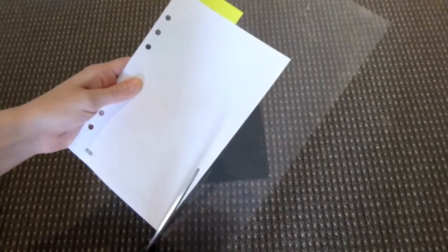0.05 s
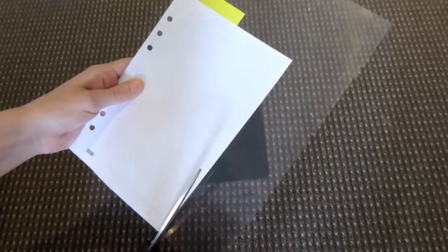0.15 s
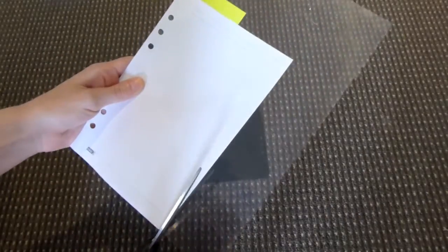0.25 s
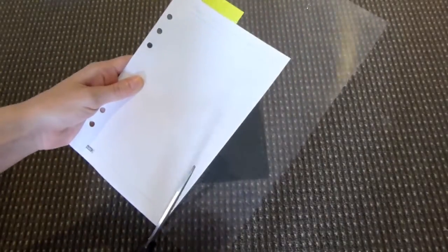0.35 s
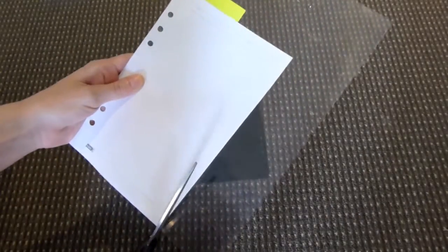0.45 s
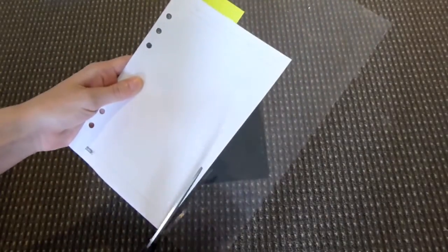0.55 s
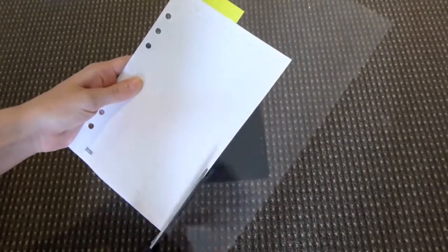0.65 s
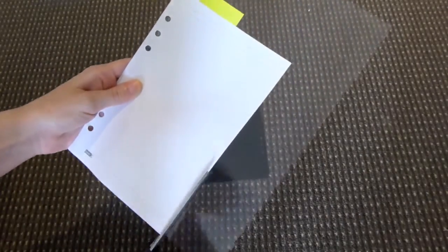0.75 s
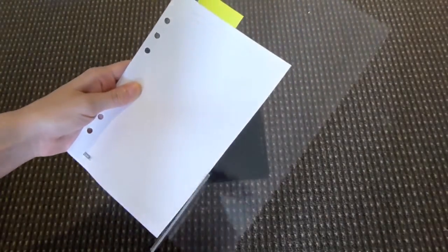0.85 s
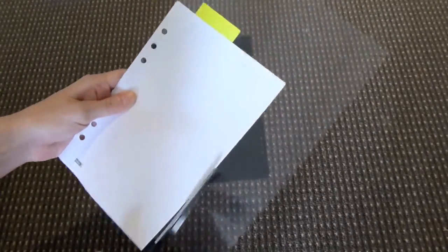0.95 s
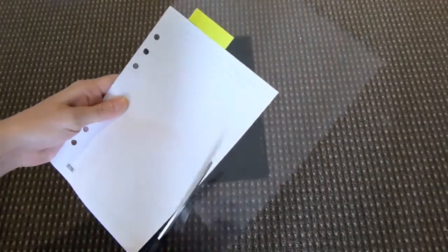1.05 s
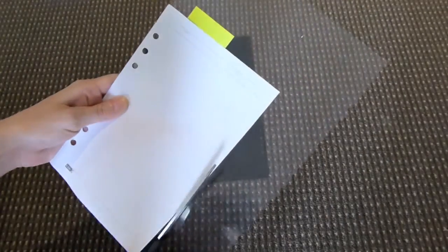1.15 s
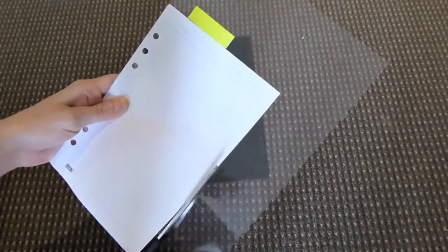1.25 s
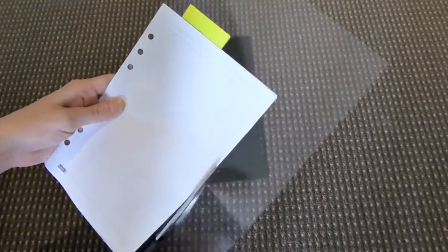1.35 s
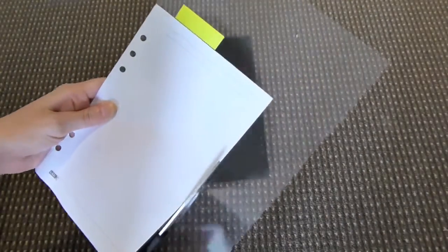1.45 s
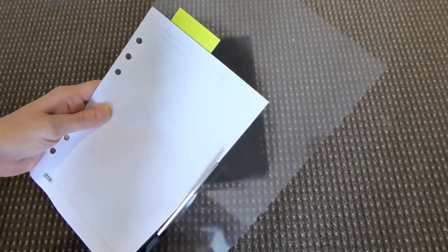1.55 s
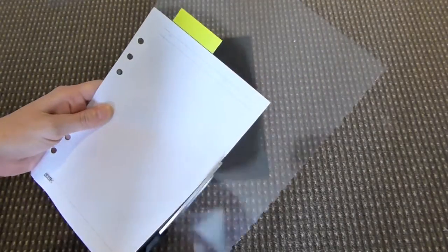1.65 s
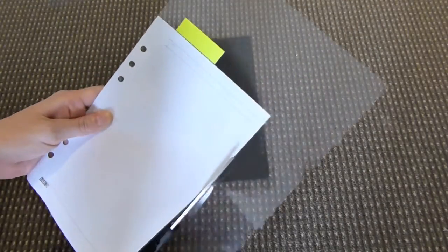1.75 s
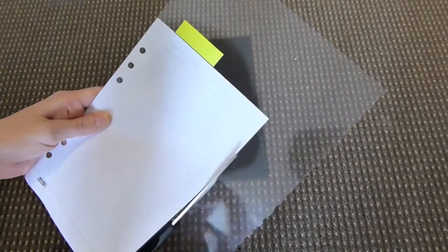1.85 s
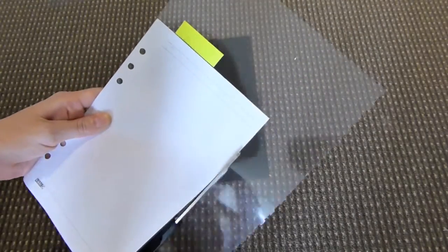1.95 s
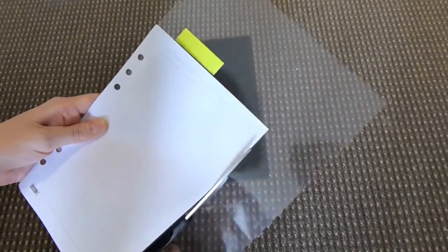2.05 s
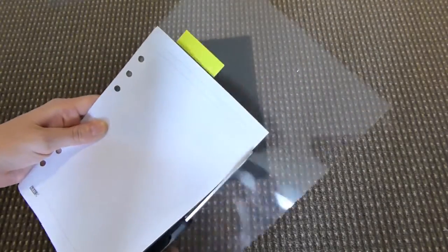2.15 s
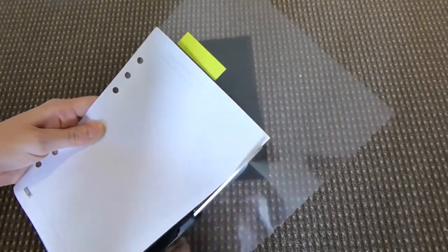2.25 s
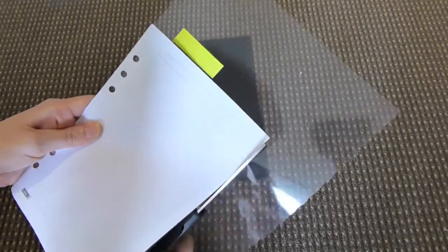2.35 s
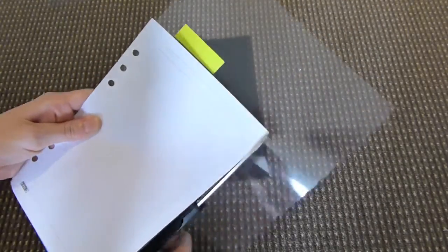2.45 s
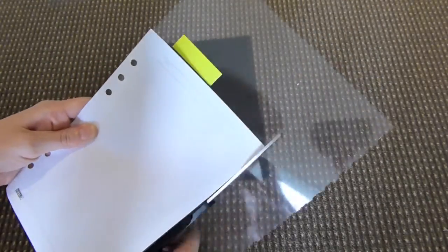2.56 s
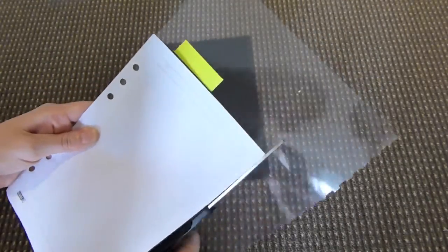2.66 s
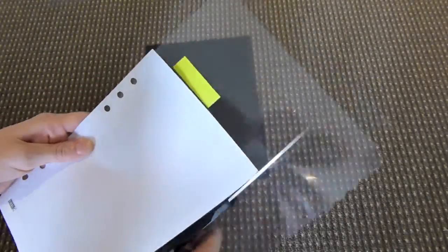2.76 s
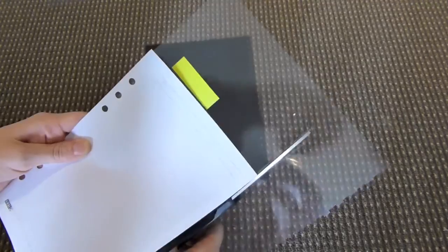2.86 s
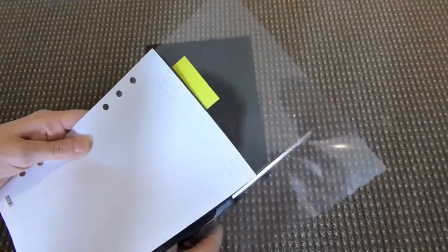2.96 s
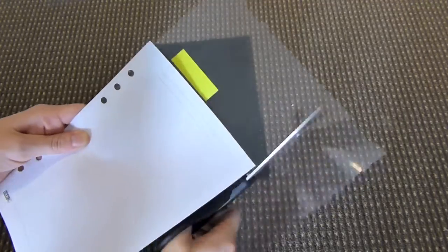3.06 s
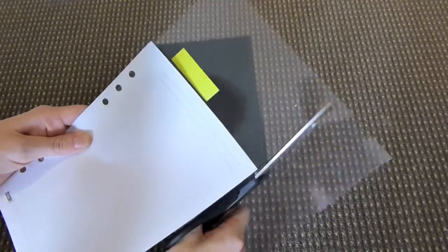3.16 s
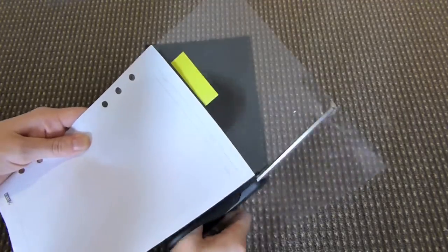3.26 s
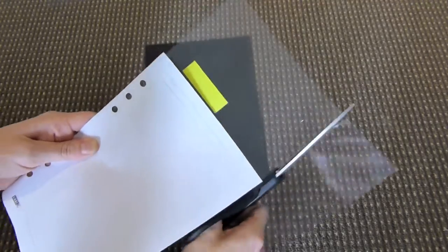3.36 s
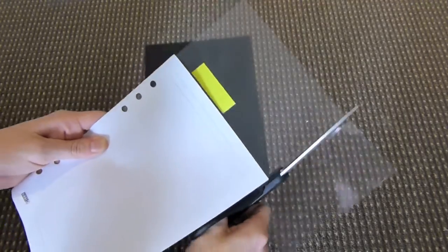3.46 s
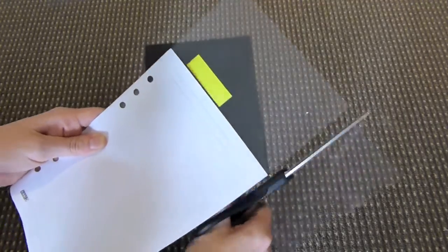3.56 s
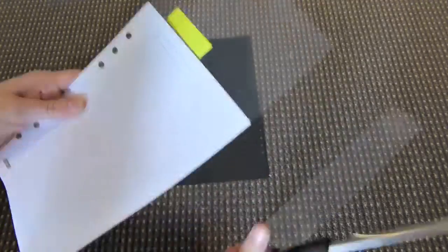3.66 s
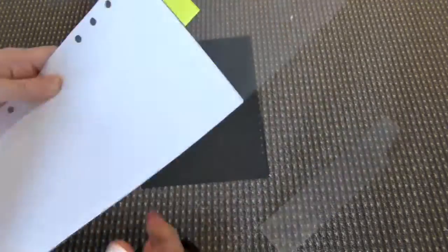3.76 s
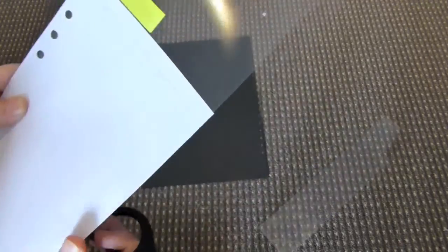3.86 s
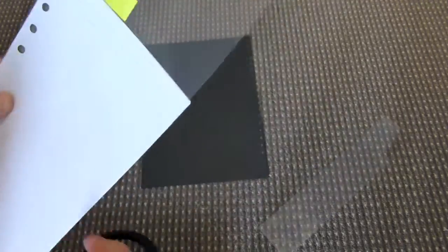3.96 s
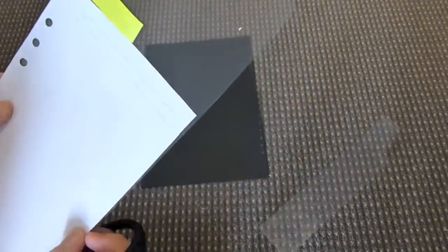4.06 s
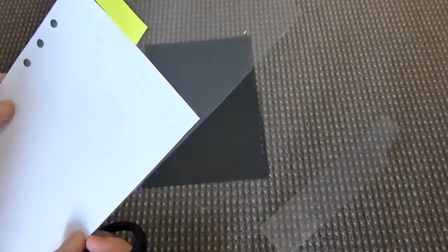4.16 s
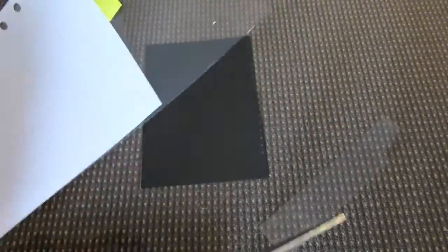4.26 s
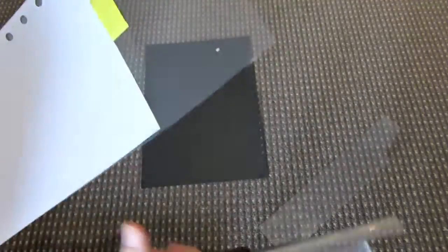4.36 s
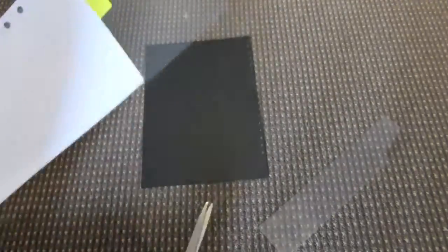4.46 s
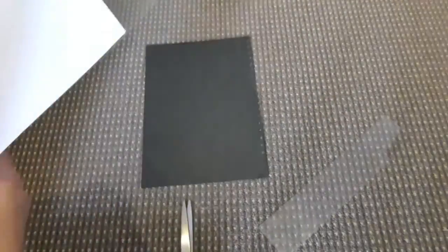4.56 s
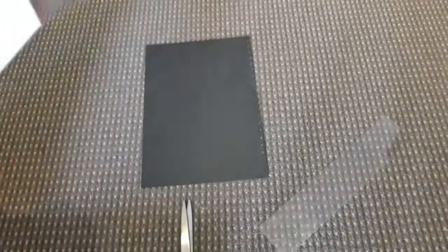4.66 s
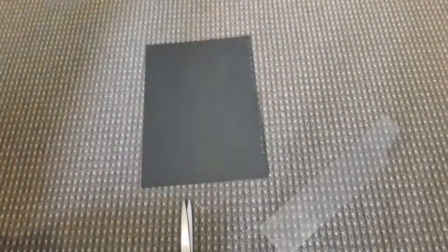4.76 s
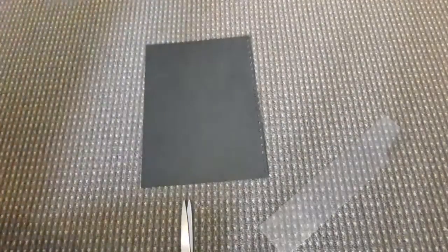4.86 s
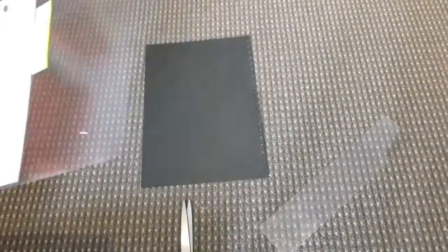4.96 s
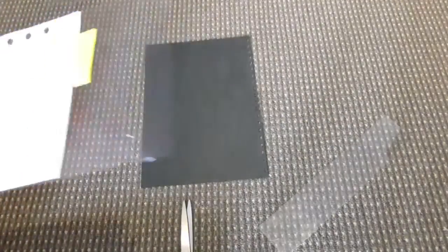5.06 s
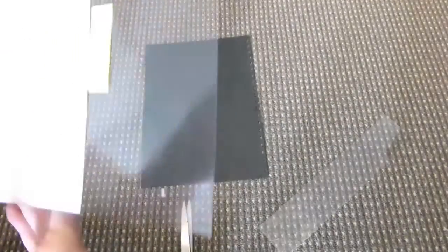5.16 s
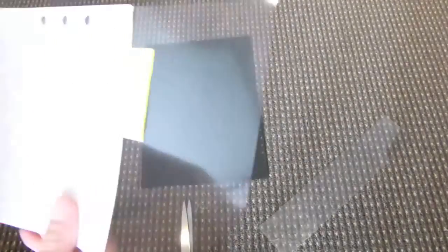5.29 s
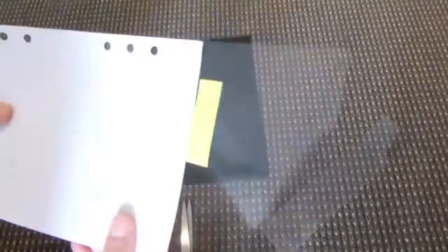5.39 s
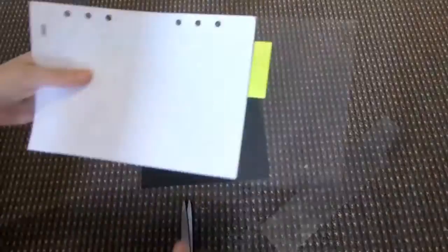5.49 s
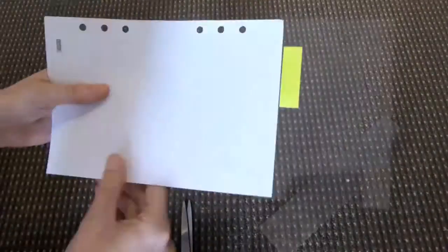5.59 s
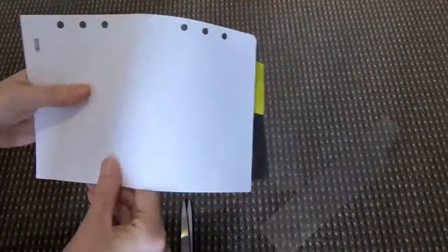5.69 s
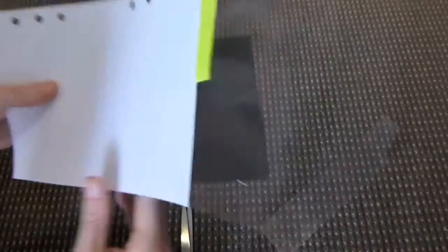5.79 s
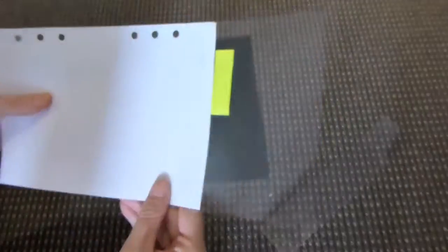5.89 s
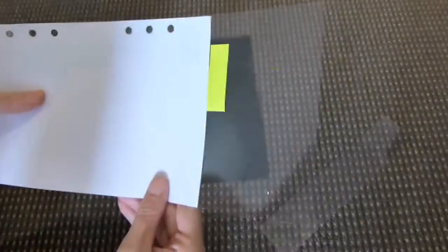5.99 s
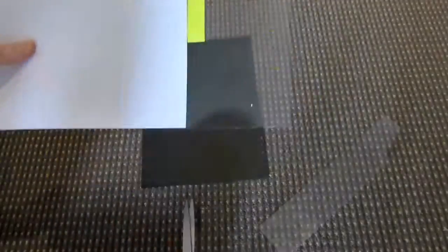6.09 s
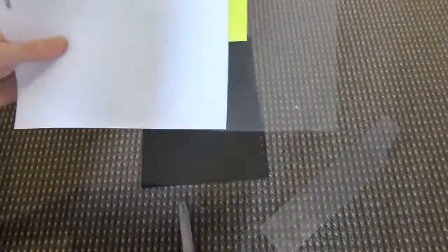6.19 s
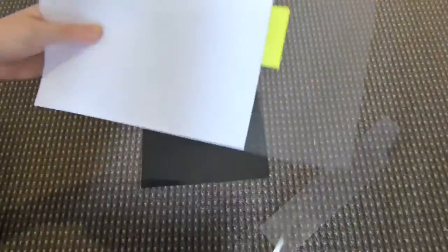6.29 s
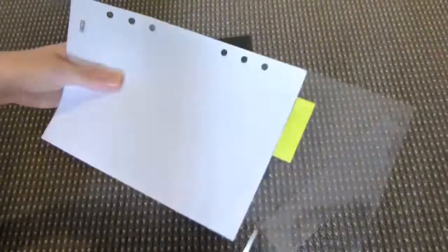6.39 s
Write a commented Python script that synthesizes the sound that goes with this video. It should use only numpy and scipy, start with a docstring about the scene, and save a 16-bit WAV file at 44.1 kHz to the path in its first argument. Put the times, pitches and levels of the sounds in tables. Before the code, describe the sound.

Close microphone over a cloth-covered desk indoors. A faint rush of room noise leads into repeated scissor cuts in thin stiff plastic: gritty crackling closures, hard dry snaps, short steel scrapes. The cuts end and light crinkles follow as the sheet is moved. The scissors land with a damped woody clack and quick bounces. Finally come a papery hiss, a crackly double flop and faint dull knocks.

```python
"""A small, quiet room: scissors cut a stiff clear plastic sheet over a cloth-covered desk, heard close up.
In each cut the sheet cracks in a run of tiny fractures while noise rubs along the closing blades; sharp
snaps and opening scrapes come between. The scissors then clack down and the sheet crinkles as it is turned.
Contacts are a push and noise bursts through a resonant body; scrapes are juddering noise.
Filtered room noise, wavering hum lines, stray ticks and a thin early whine lie behind."""
import sys
import numpy as np
from scipy import signal
from scipy.fft import rfft, irfft, next_fast_len
from scipy.io import wavfile
from scipy.ndimage import map_coordinates

SR = 44100
rng = np.random.default_rng(int(sys.argv[2]) if len(sys.argv) > 2 else 0)


def unload_wav(signal):
    """Save mono or channel-first audio to the path in sys.argv[1] as 16-bit WAV at rate SR, clipped to [-1, 1]."""
    wavfile.write(
        sys.argv[1],
        SR,
        np.round(np.clip(np.atleast_2d(signal).T, -1, 1) * 32767).astype(np.int16),
    )


N = 283563
TIME = np.arange(N) / SR
TOP_HZ = 16200  # upper band limit


def amp(db):
    """Decibels to gain."""
    return 10 ** (np.asarray(db) / 20)


def unit(x):
    """x at rms 1."""
    return x / np.sqrt(np.mean(x ** 2) + 1e-20)


def along(points, hz):
    """(frequency, value) points read on a log frequency axis."""
    point_hz, values = np.transpose(points)
    return np.interp(np.log(hz + 1), np.log(point_hz), values)


def wobble(rate):
    """A smooth random curve with rate knots a second."""
    knots = rng.standard_normal(int(N * rate / SR) + 4)
    return map_coordinates(knots, [TIME * rate])


def filtered(x, gain):
    """x times a gain that depends on frequency."""
    count = x.shape[-1]
    padded = next_fast_len(count + SR // 10)
    spectrum = rfft(x, padded) * gain(np.fft.rfftfreq(padded, 1 / SR))
    return irfft(spectrum, padded)[..., :count]


def stereo(mid, side, width):
    """Left and right from a centre signal and an unrelated side signal, widened by frequency."""
    side = filtered(side, lambda hz: amp(along(width, hz)))
    return np.array([mid + side, mid - side])


def add(out, s, sound):
    """Mix a stereo sound in at time s [s]."""
    start = max(round(s * SR), 0)
    part = out[:, start:][:, :sound.shape[1]]
    part += sound[:, :part.shape[1]]


def burst(t60, count=8192, rise_s=1e-6):
    """Two unrelated noises of energy 1 that rise and die away by 60 dB in t60 seconds."""
    t = np.arange(1, count + 1) / SR
    envelope = amp(-60 * t / t60) * (1 - np.exp(-t / rise_s))
    noise = rng.standard_normal((2, count)) * envelope
    return noise / np.linalg.norm(noise, axis=1, keepdims=True)


# Resonances of the steel blades: (frequency [Hz])
BLADE_MODES = [1140, 3940, 4470, 5670]


def body(colour, tilt_db, vary_db, blade_db, blade_width_hz=130, vary_width_hz=550, low_hz=270, size=1024):
    """Causal response of energy 1: fixed blade resonances, and sheet resonances drawn afresh at each call."""
    hz = np.fft.rfftfreq(size, 1 / SR)
    octaves = np.log2(np.maximum(hz, 500) / 500)  # tilt starts at 500 Hz
    blades = sum(1 / (1 + ((hz - mode) / blade_width_hz) ** 2) for mode in BLADE_MODES)
    sheet = map_coordinates(rng.standard_normal(256), [hz / vary_width_hz]) * np.minimum(octaves / 2, 1)
    gain = amp(along(colour, hz) + tilt_db * octaves + blade_db * blades + vary_db * sheet)
    gain /= 1 + (low_hz / (hz + 20)) ** 2  # small things radiate little bass
    gain /= 1 + (hz / TOP_HZ) ** 20  # keep within the upper band limit
    # fold the cepstrum forward in time: minimum phase, so the energy comes early
    cepstrum = irfft(np.log(gain))
    cepstrum[1:size // 2] *= 2
    cepstrum[size // 2 + 1:] = 0
    response = irfft(np.exp(rfft(cepstrum)))
    return response / np.linalg.norm(response)


# Stereo width of the close sounds: (frequency [Hz], side gain relative to centre [dB])
CONTACT_WIDTH = [(1200, -59), (2800, -20.5), (6500, -4.5), (13000, -13.5)]
LEAD = int(.006 * SR)  # samples of build-up before a contact gives way
CRACK_RISE_S = 0.0005  # a crack takes a moment to spread


def contacts(table, colour, crest_db, crack_db, crack_t60, ring_db, ring_t60, room_db, lead_db, vary_db,
             blade_db, lead_t60=0.0077, room_t60=0.12, room_hz=2200):
    """Each contact builds up, gives way in a push and a spray of cracks, rings, and the room answers."""
    out = np.zeros((2, N))
    window = int(.004 * SR)
    for s, db, tilt_db in table:
        lead = amp(lead_db) * burst(lead_t60, count=LEAD)[:, ::-1]
        cracks = amp(crack_db) * burst(crack_t60, rise_s=CRACK_RISE_S)
        ring = amp(ring_db) * burst(ring_t60)
        # cloth soaks up the treble of the room's answer
        room = amp(room_db) * filtered(burst(room_t60), lambda hz: 1 / np.hypot(1, hz / room_hz))
        mid, side = np.hstack([lead, cracks + ring + room])
        mid[LEAD] -= 1  # the push
        response = body(colour, tilt_db, vary_db, blade_db)
        sound = signal.fftconvolve(stereo(mid, side, CONTACT_WIDTH), response[None], axes=1)
        # the nominal peak lies crest_db above the attack level
        attack = np.sqrt(np.sum(sound.mean(0)[:LEAD + window] ** 2) / window)
        add(out, s - LEAD / SR, amp(db - crest_db) * sound / attack)
    return out


# Colour of the scraping strokes: (frequency [Hz], relative level [dB])
STROKE_COLOUR = [(150, -35.5), (550, -8), (1200, 4), (1600, 5), (2600, -4), (3800, -0.5), (7000, -10),
                 (12000, -12), (15500, -21)]


def scrapes(strokes, grain_db, judder_db, edge_s, fade_t60, vary_db, blade_db):
    """Steel edges catch on countless tiny ridges, as rough noise; the pressure judders along the stroke."""
    out = np.zeros((2, N))
    grip = amp(grain_db * wobble(1800) + judder_db * wobble(170))
    for start, end, db, fade_db, tilt_db in strokes:
        length_s = end - start
        t = np.arange(int((length_s + fade_t60) * SR)) / SR
        noise = rng.standard_normal((2, 2 * SR))[:, :len(t)]
        ridges = unit(noise * grip[int(start * SR):][:len(t)])
        pressure = np.minimum(t / edge_s, 1)
        pressure *= amp(-60 * np.maximum(t - length_s, 0) / fade_t60)
        pressure *= amp(-fade_db * np.minimum(t / length_s, 1))
        response = body(STROKE_COLOUR, tilt_db, vary_db, blade_db)
        mid, side = signal.fftconvolve(ridges * pressure, response[None], axes=1)
        add(out, start, amp(db) * stereo(mid, amp(-1.0) * side, CONTACT_WIDTH))
    return out


def slide(at_s, length_s, level_db, centre_hz):
    """A smooth face brushes over the plastic: a soft swell of hiss around centre_hz."""
    band = lambda hz: np.exp(-2 * np.log2((hz + 1) / centre_hz) ** 2)
    mid, side = unit(filtered(rng.standard_normal((2, N)), band))
    swell = np.exp(-((TIME - at_s) / length_s) ** 2) * amp(level_db + 2 * wobble(60))
    return swell * stereo(mid, side, CONTACT_WIDTH)


# Colour of the steady room noise: (frequency [Hz], relative level per Hz [dB])
AIR_COLOUR = [(15, -55), (25, -18.5), (161, -23.5), (394, -16.5), (451, -12), (575, -2), (754, -2.5),
              (936, -4.5), (1070, -3.5), (2220, -6.5), (2480, -9.5), (8590, -22.5), (16000, -31.5)]
# Stereo width of the room noise: (frequency [Hz], side gain relative to centre [dB])
AIR_WIDTH = [(110, -0.5), (600, -21.5), (4000, 0)]
# Faint hum lines: (frequency [Hz], relative level [dB])
HUM_LINES = [(399, -80), (582, -73.5), (797, -70), (915, -73), (2196, -75)]


def room_tone(air_db, hum_db, ripple_db, ripple_hz):
    """A soft steady rush, rippled by the room's standing waves, with a few unsteady hum lines."""
    knots = rng.standard_normal(2048)

    def air_gain(hz):
        """Air colour with random ripples that shrink below 800 Hz."""
        ripple = map_coordinates(knots, [hz / ripple_hz]) * np.minimum(hz / 800, 1)
        return amp(along(AIR_COLOUR, hz) + ripple_db * ripple)

    mid, side = unit(filtered(rng.standard_normal((2, N)), air_gain))
    hum = np.zeros(N)
    for hz, db in HUM_LINES:
        level = amp(db + 3.4 * wobble(2.115))
        hum += level * np.sin(2 * np.pi * hz * TIME + .5 * wobble(8.5))
    return amp(air_db) * stereo(mid, side, AIR_WIDTH) + amp(hum_db) * hum


# Colour of the crinkling sheet: (frequency [Hz], relative level [dB])
CRINKLE_COLOUR = [(200, -35), (1200, 13), (1900, 2), (3500, -1.5), (6000, -5.5), (15500, -20)]


def ticks(per_s, level_db, spread_db):
    """The hand-held sheet is never still: short cracks at random times make faint stray ticks."""
    levels_db = level_db + spread_db * np.minimum(rng.exponential(size=N), 2)
    sizes = (rng.random(N) < per_s / SR) * amp(levels_db)
    channels = []
    for crack in burst(0.0063, count=1024):
        tick = np.convolve(crack, body(CRINKLE_COLOUR, 1.0, 1.9, 0))
        channels.append(signal.fftconvolve(sizes, tick)[:N])
    mid, side = channels
    return stereo(mid, side, CONTACT_WIDTH)


# Level of the thin whine, before its flutter: (time [s], level [dB])
WHINE_LEVEL = [(.635, -80), (.662, -62), (.745, -56), (.8, -68), (1.05, -64), (1.17, -76), (1.28, -63),
               (1.48, -70), (1.525, -56), (1.7, -77), (2.05, -61), (2.28, -70)]


def whine(pitch_hz, flutter_db):
    """A thin sine comes and goes with fluttering level and phase, and is silent after its last point."""
    level_db = np.interp(TIME, *np.transpose(WHINE_LEVEL), right=-np.inf) + flutter_db * wobble(21.9)
    return amp(level_db) * np.sin(2 * np.pi * pitch_hz * TIME + 0.36 * wobble(52))


# Crinkles of the held sheet and paper, and one dull tap (4.7315 s) as the scissors settle:
# (time [s], nominal peak level [dB], tilt [dB per octave])
CRINKLES = [(0.353, -31, 3), (2.3635, -27.5, 1), (2.628, -26, -1.5), (2.848, -25, 2.5), (2.905, -28, -0.5),
            (3.746, -33.5, 6), (3.944, -25.5, 5), (3.998, -32, 1.5), (4.166, -31, 1), (4.7315, -24.5, -1),
            (4.917, -29, 2), (4.9265, -24.5, 3), (5.046, -37.5, 12), (5.176, -32.5, 4.5),
            (5.521, -26.5, 2.0), (6.096, -30.5, 0.5), (6.219, -33.5, 5)]


def crinkles():
    """Crinkles of the held sheet and paper, and one dull tap as the scissors settle: crackle and short ring."""
    return contacts(CRINKLES, CRINKLE_COLOUR, crest_db=11, crack_db=5, crack_t60=0.007, ring_db=3,
                    ring_t60=0.06, room_db=-8, lead_db=-1, vary_db=3.5, blade_db=-3, lead_t60=0.02)


# Closing strokes: (start [s], end [s], final level [dB], tilt [dB per octave])
CUTS = [(0.831, 0.911, -50, 1), (1.323, 1.385, -45.5, -1), (1.642, 1.718, -49, 0), (1.898, 1.97, -42, -1),
        (2.161, 2.24, -49, -2), (2.42, 2.485, -45, -1.5), (2.632, 2.737, -48, -0.5),
        (2.926, 2.999, -41.5, 1), (3.215, 3.269, -37.5, 2)]
RUB_SWELL_DB = 3.5  # the rubbing grows as the blades bite deeper


def rubbing():
    """The closing blades rub along the sheet, louder towards the end of each cut."""
    closings = [(start, end, final_db - RUB_SWELL_DB, -RUB_SWELL_DB, tilt_db)
                for start, end, final_db, tilt_db in CUTS]
    return scrapes(closings, grain_db=4.0, judder_db=2.5, edge_s=0.006, fade_t60=0.07, vary_db=2, blade_db=1)


# Separate cracks as the sheet gives way: (time [s], nominal peak level [dB])
SLIPS = [(0.839, -30.5), (0.8522, -29.5), (0.8692, -31), (0.88, -25.5), (0.893, -19.5), (0.9053, -22),
         (1.3239, -23), (1.3402, -20.5), (1.354, -21.5), (1.368, -16), (1.3783, -17), (1.6419, -19.5),
         (1.682, -21.5), (1.7174, -24.5), (1.739, -18), (1.8909, -24.5), (1.9161, -24), (1.9273, -20),
         (1.9394, -17.5), (1.954, -18.5), (1.9779, -20), (2.1635, -20.5), (2.1797, -20.5), (2.194, -19),
         (2.2188, -19), (2.2287, -22), (2.2396, -23), (2.424, -19), (2.4468, -16.5), (2.4549, -20),
         (2.484, -15), (2.669, -21), (2.7149, -13), (2.7252, -18.5), (2.9398, -25), (2.953, -25),
         (2.9641, -22.5), (2.9766, -24), (2.996, -20), (3.2138, -24), (3.226, -25), (3.2339, -23),
         (3.247, -17), (3.2588, -21.5), (3.275, -23.5)]
# Colour of those cracks: (frequency [Hz], relative level [dB])
SLIP_COLOUR = [(150, -36), (550, -13.5), (800, -4), (1200, 6.5), (2600, -7.5), (3800, 1.5), (5000, -5.5),
               (7000, -11), (12000, -14), (15500, -19.5)]


def slips():
    """The sheet gives way in small fractures, each taking its brightness from the nearest cut."""
    starts, ends, _, tilts = np.transpose(CUTS)
    middles = (starts + ends) / 2
    table = [(s, db, tilts[np.argmin(abs(s - middles))]) for s, db in SLIPS]
    return contacts(table, SLIP_COLOUR, crest_db=11.5, crack_db=4.5, crack_t60=0.0046, ring_db=-3,
                    ring_t60=0.056, room_db=-1.5, lead_db=-7.5, vary_db=3.0, blade_db=0)


# Blades meet or the sheet breaks through: (time [s], nominal peak level [dB], tilt [dB per octave])
SNAPS = [(0.9895, -15, 0), (1.1911, -20, -0.5), (1.5325, -9, 0), (1.7293, -14.5, -2), (2.288, -10, -1.5),
         (2.3068, -19, 0.5), (2.543, -14.5, 2), (2.5746, -21.5, 1.5), (2.6895, -14, 0.5), (3.065, -11, 4.5),
         (3.1293, -19.5, 3.5), (3.133, -22.5, 7.5), (3.3466, -15.5, 1.5), (3.5896, -17, 0), (3.602, -27, 3),
         (3.622, -24.5, 1)]
# Colour of the snaps: (frequency [Hz], relative level [dB])
SNAP_COLOUR = [(200, -38.5), (600, -5), (1200, 4.5), (2400, -2.5), (3800, 1), (8600, -10.5), (11500, -9.5),
               (15500, -20)]
REBOUND_S, REBOUND_LOSS_DB, REBOUND_DULLING_DB = .0035, 11.5, 3  # delay, loss, tilt lost per octave


def snaps():
    """After each sharp snap the sheet springs back against the blade: later, softer and duller."""
    rebounds = [(s + REBOUND_S, db - REBOUND_LOSS_DB, tilt_db - REBOUND_DULLING_DB)
                for s, db, tilt_db in SNAPS]
    return contacts([*SNAPS, *rebounds], SNAP_COLOUR, crest_db=11, crack_db=4, crack_t60=0.0055, ring_db=-7,
                    ring_t60=0.07, room_db=-9, lead_db=-8, vary_db=3.5, blade_db=3, lead_t60=0.02)


# Opening strokes, a negative fade growing louder:
# (start [s], end [s], starting level [dB], fade over the stroke [dB], tilt [dB per octave])
OPENINGS = [(.996, 1.057, -49, -7.5, 2.5), (1.431, 1.463, -36.5, -0.5, 2), (1.536, 1.547, -33, 4, 1.5),
            (1.786, 1.852, -36.5, 4.5, 0), (2.033, 2.077, -37, -0.5, 0), (2.293, 2.358, -37.5, 7.5, 1.5),
            (2.536, 2.594, -31, 16.5, 1.5), (2.772, 2.825, -36, 1.5, 1.5), (3.134, 3.154, -38, 3, 2.5),
            (3.348, 3.372, -29.5, 14.5, 0)]


def opening():
    """The blades scrape apart, edge on edge."""
    return scrapes(OPENINGS, grain_db=3.5, judder_db=2.0, edge_s=0.0025, fade_t60=0.054, vary_db=2.0,
                   blade_db=0.0)


# Handles and flexing sheet knock: (time [s], nominal peak level [dB], tilt [dB per octave])
KNOCKS = [(1.096, -29, -4.5), (1.12, -28, -0.5), (2.719, -21.5, -4), (3.83, -23, 1), (6.103, -30.5, -3.0),
          (6.172, -29, -4.5)]
# Colour of the knocks: (frequency [Hz], relative level [dB])
KNOCK_COLOUR = [(230, -50), (600, -5), (1200, 8.5), (2400, -8.5), (3000, -5.5), (4600, -18.5), (6000, -21),
                (15500, -40)]


def knocks():
    """Dull knocks of the handles and the flexing sheet, with more ring than crack."""
    return contacts(KNOCKS, KNOCK_COLOUR, crest_db=9.5, crack_db=-5.5, crack_t60=0.0073, ring_db=4.5,
                    ring_t60=0.082, room_db=2, lead_db=-2, vary_db=6.0, blade_db=0.0)


# The loosening strip drags, a negative fade growing louder:
# (start [s], end [s], starting level [dB], fade over the stroke [dB], tilt [dB per octave])
DRAGS = [(2.42, 3.3, -50, -0.5, -2.5), (3.38, 3.62, -60.5, -11.5, -0.5)]


def drag():
    """The loosening strip drags along the blade in long, uneven scrapes."""
    return scrapes(DRAGS, grain_db=5.5, judder_db=4.5, edge_s=0.091, fade_t60=0.31, vary_db=0.0, blade_db=0)


def strip():
    """The last strip slides off the blade with a high hiss."""
    return slide(at_s=3.57, length_s=.085, level_db=-59, centre_hz=11500)


# Colour of the scissors on the desk: (frequency [Hz], relative level [dB])
DROP_COLOUR = [(290, -44), (550, -12), (1200, 2), (1550, -2.5), (2150, -18), (3050, -14), (3600, -22),
               (4600, -31), (5200, -54), (15500, -76)]
DROP_S, DROP_DB, DROP_TILT_DB = 4.5158, -10, 2.5  # first contact: time, nominal peak, tilt per octave
FLIGHT_S, FLIGHT_SHRINK = .0295, .65  # first flight, and each flight over the one before
BOUNCE_LOSS_DB, BOUNCE_DULLING_DB = 2.1, 3.3  # loss times bounce number squared, tilt lost at each bounce
# the steel tips touch just before the handles, lighter and brighter
TIP_LEAD_S, TIP_LOSS_DB, TIP_TILT_DB = 0.0014, 2, 7.5


def bounces(count=3):
    """Landings ever closer, softer and duller: rows (time [s], nominal peak [dB], tilt [dB per octave])."""
    rows = []
    for k in range(count):
        flown_s = FLIGHT_S * (1 - FLIGHT_SHRINK ** k) / (1 - FLIGHT_SHRINK)
        rows.append((DROP_S + flown_s, DROP_DB - BOUNCE_LOSS_DB * k ** 2, DROP_TILT_DB - BOUNCE_DULLING_DB * k))
    return rows


def put_down():
    """The scissors clack and bounce on the cloth-covered desk, which damps their ring."""
    tips = (DROP_S - TIP_LEAD_S, DROP_DB - TIP_LOSS_DB, TIP_TILT_DB)
    return contacts([tips, *bounces()], DROP_COLOUR, crest_db=12, crack_db=-10, crack_t60=0.005, ring_db=-12,
                    ring_t60=0.06, room_db=-17, lead_db=-18, vary_db=1.5, blade_db=1)


def paper():
    """Paper brushes over the plastic with a soft hiss."""
    return slide(at_s=5.63, length_s=.11, level_db=-58.5, centre_hz=4600)


# The whole sheet flops over: (time [s], nominal peak level [dB], tilt [dB per octave])
FLOPS = [(5.866, -21, -2), (5.913, -13.5, 1)]
# Colour of the flops: (frequency [Hz], relative level [dB])
FLOP_COLOUR = [(180, -67), (300, -25), (1200, 2.5), (1700, -9), (3400, -1), (3940, -6.5), (4490, -9),
               (5300, -19), (6360, -14.5), (8840, -29), (15500, -49)]


def flops():
    """The whole sheet flops as it is turned over, in a longer spray of cracks."""
    return contacts(FLOPS, FLOP_COLOUR, crest_db=11.0, crack_db=7.5, crack_t60=0.025, ring_db=6.5,
                    ring_t60=0.044, room_db=-14, lead_db=0.5, vary_db=2, blade_db=-1.5, lead_t60=0.015)


def scene():
    """The room, the cutting and the handling together."""
    background = room_tone(air_db=-52.5, hum_db=4.5, ripple_db=2.0, ripple_hz=44.66)
    background += whine(pitch_hz=7587, flutter_db=3.2)
    cutting = rubbing() + slips() + snaps() + opening()
    handling = ticks(per_s=8, level_db=-39, spread_db=4) + crinkles() + knocks() + drag() + strip()
    handling += put_down() + paper() + flops()
    return background + cutting + handling


def record(dry):
    """A steep slope removes everything above the band limit."""
    return filtered(dry, lambda hz: np.clip((TOP_HZ - hz) / 700 + .5, 0, 1))


dry = scene()
out = record(dry)
unload_wav(out)
```